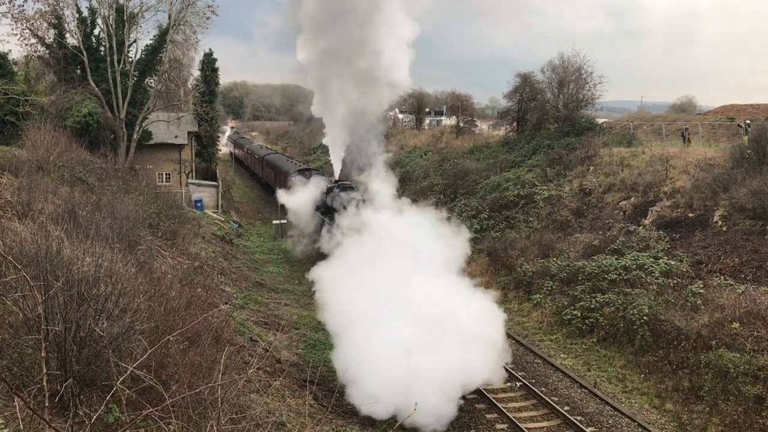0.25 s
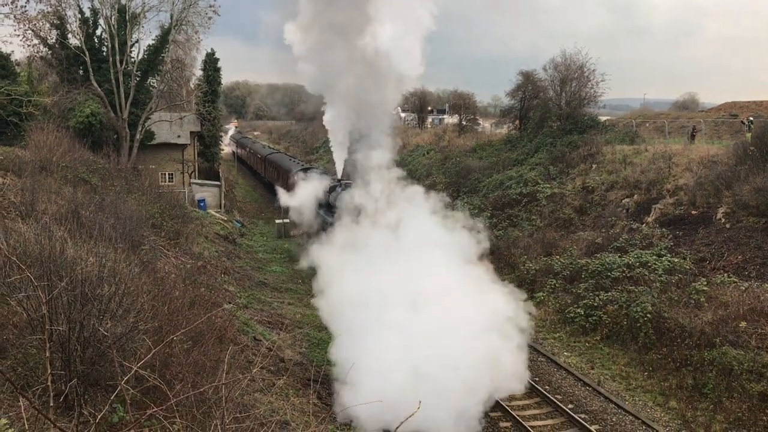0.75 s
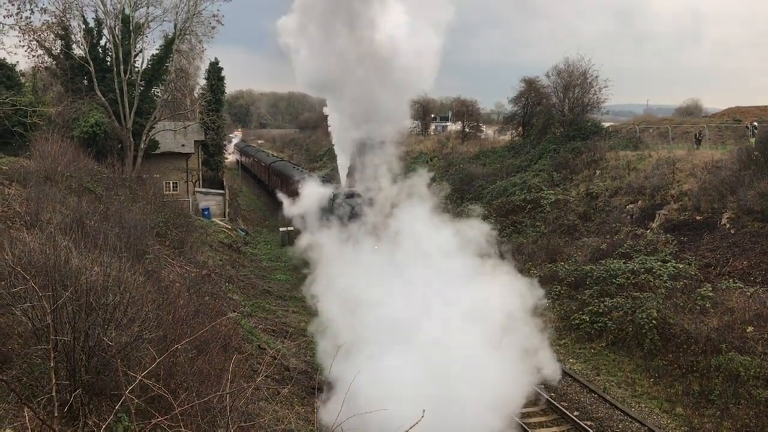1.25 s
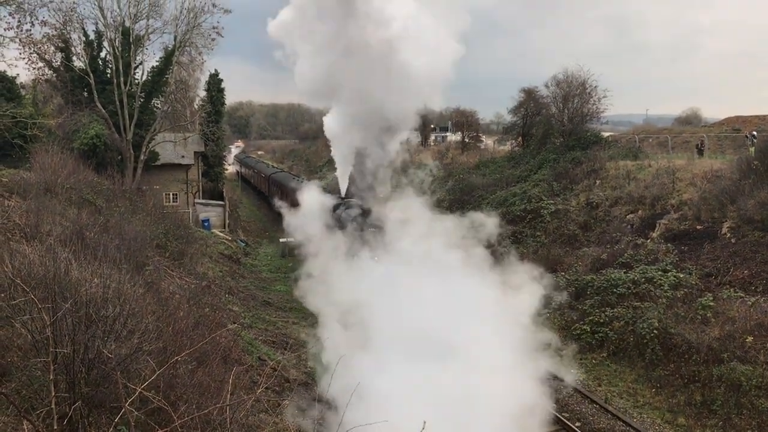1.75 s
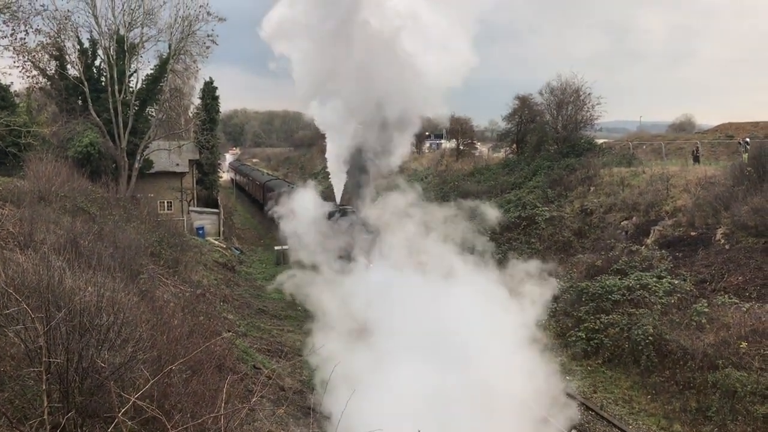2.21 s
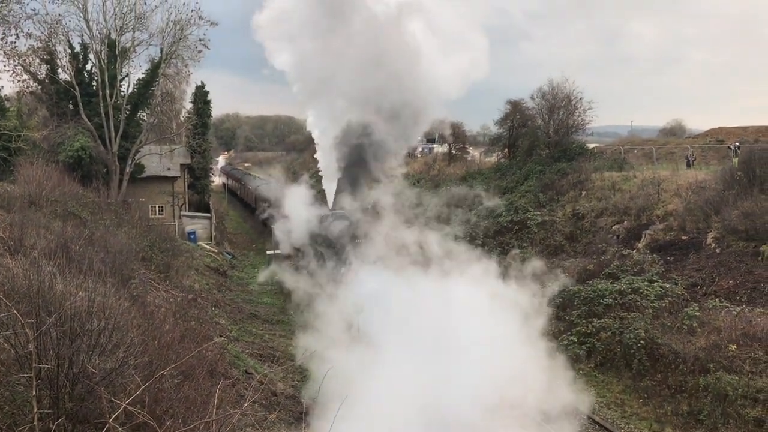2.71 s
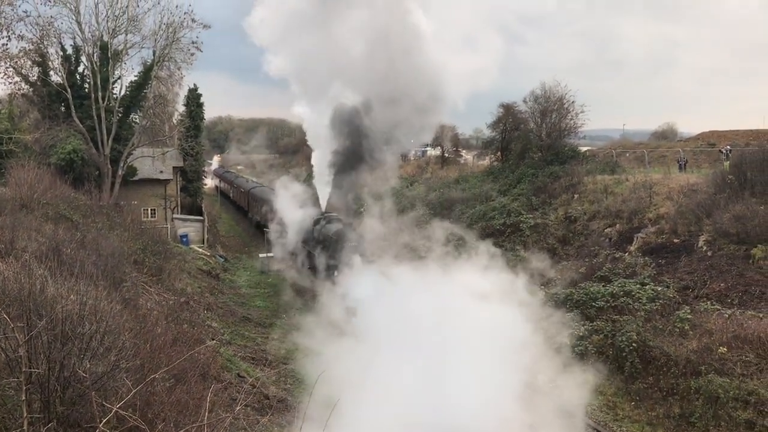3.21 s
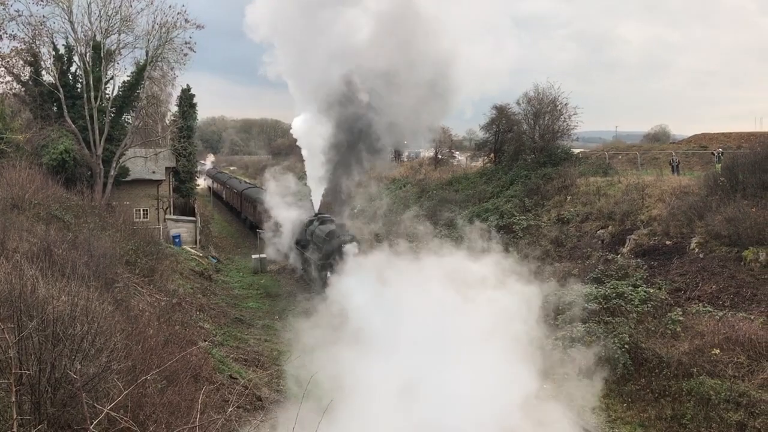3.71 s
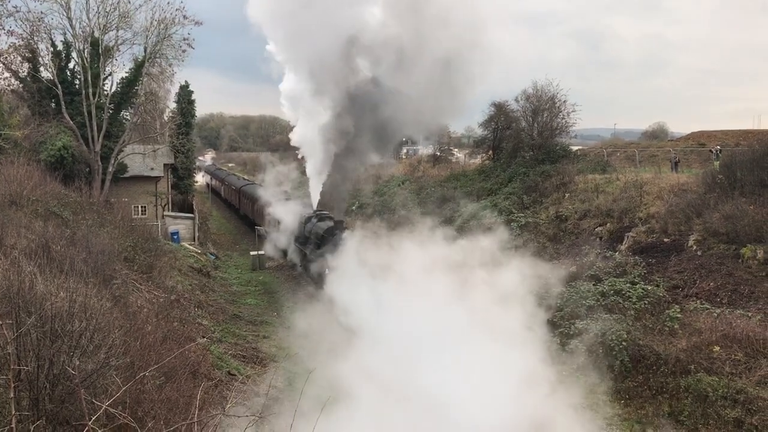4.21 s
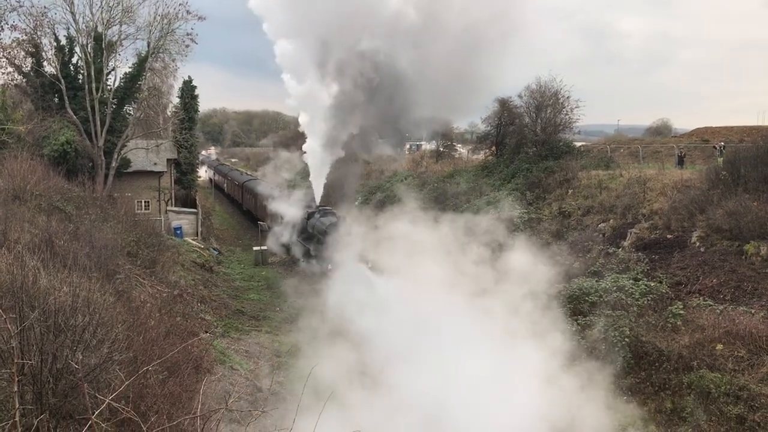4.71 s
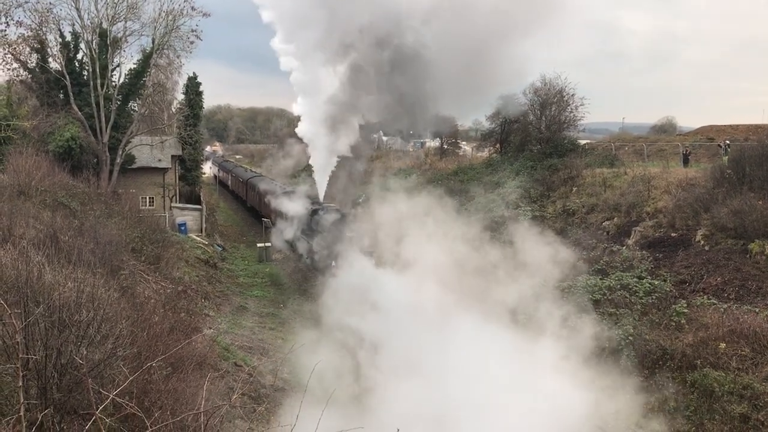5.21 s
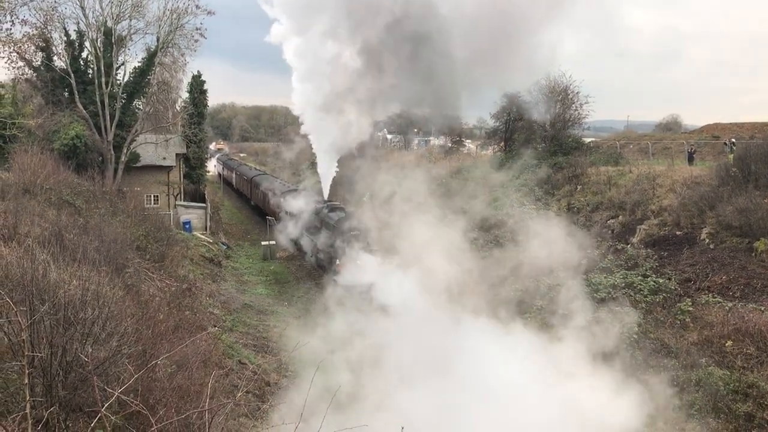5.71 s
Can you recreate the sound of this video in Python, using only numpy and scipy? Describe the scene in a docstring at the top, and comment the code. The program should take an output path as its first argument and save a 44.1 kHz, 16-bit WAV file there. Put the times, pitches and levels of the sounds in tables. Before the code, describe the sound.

Loud steam hiss from a rumbling locomotive drops suddenly to a thinner jet, with a wavering high whistle and a few low wind thuds.

```python
"""A steam locomotive rumbles through a cutting, blowing steam from its cylinder drain cocks and its
safety valve; a narrow leak keeps up a very high, unsteady whistle throughout.
At 2.2 s the cocks shut and the hiss abruptly thins, leaving the valve blowing.
From 2.7 s a breeze gets up; between 3.8 and 5.1 s its eddies bump the microphone with low thuds."""
import sys
import numpy as np
from scipy import signal
from scipy.fft import rfft, irfft, next_fast_len
from scipy.io import wavfile

SR = 44100
rng = np.random.default_rng(int(sys.argv[2]) if len(sys.argv) > 2 else 0)


def waveform_to_disk(signal):
    """Save audio, clipped to [-1, 1], as 16-bit WAV at the path in sys.argv[1]."""
    frames = np.transpose(np.atleast_2d(signal))
    scaled = np.clip(frames, -1, 1) * 32767
    samples = np.round(scaled).astype(np.int16)
    wavfile.write(sys.argv[1], SR, samples)


N = 262395
TIME_S = np.arange(N) / SR
FREQ_HZ = np.maximum(np.fft.rfftfreq(N, 1 / SR), 1)


def from_db(db):
    """Decibels to gain."""
    return 10 ** (np.asarray(db) / 20)


def unit_rms(x):
    """Scale to rms 1."""
    return x / np.sqrt(np.mean(x ** 2) + 1e-20)


def curve(rows):
    """Interpolate (seconds, value) rows at every sample."""
    return np.interp(TIME_S, *np.transpose(rows))


def spectrum_db(rows):
    """Interpolate (Hz, dB) rows on a log-frequency axis."""
    hz, db = np.transpose(rows)
    return np.interp(np.log(FREQ_HZ), np.log(hz), db)


def ramp(start_s, length_s):
    """Linear rise from 0 to 1."""
    return np.clip((TIME_S - start_s) / length_s, 0, 1)


def swell(peak_s, peak_db, sigma_s):
    """Gain of one Gaussian rise and fall."""
    return from_db(peak_db) * np.exp(-((TIME_S - peak_s) / sigma_s) ** 2 / 2)


def filtered(x, gain):
    """Apply a gain per frequency."""
    size = next_fast_len(N, real=True)
    bin_gain = np.interp(np.fft.rfftfreq(size, 1 / SR), FREQ_HZ, gain)
    return irfft(rfft(x, size) * bin_gain, size)[:N]


def noise(gain):
    """Coloured noise, rms 1."""
    return unit_rms(filtered(rng.standard_normal(N), gain))


def drift(corner_hz):
    """Slow random wander, rms 1."""
    hop, settle = 40, 2000
    pole = np.exp(-2 * np.pi * corner_hz * hop / SR)
    white = rng.standard_normal(N // hop + settle + 2)
    slow = signal.lfilter([1], [1, -2 * pole, pole * pole], white)[settle:]
    return np.interp(np.arange(N) / hop, np.arange(len(slow)), unit_rms(slow))


def rumble(lumpy_db):
    """Low, lumpy noise of the rolling train, the breeze and its gusts; their powers add."""
    # Rumble spectrum. Each row: frequency in Hz, relative level in dB.
    colour = [(20, -42), (30, -10), (42, 1.5), (78, 3), (115, -1.5), (170, -11.5), (300, -26), (800, -58)]
    # Each row: peak time in seconds, peak level in dB, sigma in seconds.
    gusts = [(3.02, -38.5, 0.099), (4.12, -37.5, 0.24), (4.674, -33.5, 0.093), (5.046, -36, 0.061)]
    train_db, breeze_db = -47.8, -43.5
    power = from_db(train_db) ** 2 + from_db(breeze_db) ** 2 * ramp(start_s=2.7, length_s=0.12)
    power += sum(swell(*gust) ** 2 for gust in gusts)
    return np.sqrt(power) * from_db(lumpy_db * drift(7.2)) * noise(from_db(spectrum_db(colour)))


def buffets():
    """Each eddy briefly pushes and pulls the microphone diaphragm."""
    # Each row: time in seconds, peak level in dB, pitch in Hz, half length in seconds.
    eddies = [(3.798, -23, 70, 0.0057), (4.185, -31, 72, 0.023), (4.423, -18, 125, 0.0022),
              (4.432, -15.5, 85, 0.0066), (4.644, -21, 66, 0.0087), (4.679, -16, 109, 0.0047),
              (4.701, -27, 70, 0.014), (4.765, -26, 75, 0.0067), (5.014, -32, 80, .016),
              (5.071, -27, 87.4, 0.011)]
    out = np.zeros(N)
    for peak_s, peak_db, hz, half_s in eddies:
        offset_s = TIME_S - peak_s
        envelope = from_db(peak_db) * np.exp(-(offset_s / half_s) ** 2)
        out += envelope * np.cos(2 * np.pi * (hz * offset_s + rng.random()))
    return out


def flares():
    """The jet sings up breathily for a moment as turbulence rings in one resonance."""
    # Each row: peak time in seconds, peak level in dB, sigma in seconds, centre in Hz, width in Hz.
    resonances = [(.3, -30, .15, 2050, 120), (1.48, -28.5, 0.12, 2046, 120),
                  (2.85, -26.5, 0.047, 3440, 800), (3.663, -32.5, .06, 5170, 900),
                  (4.8, -30.5, 0.041, 5000, 900)]
    out = np.zeros(N)
    for peak_s, peak_db, sigma_s, centre_hz, width_hz in resonances:
        resonance = 1 / (1 + (2 * (FREQ_HZ - centre_hz) / width_hz) ** 2)
        out += swell(peak_s, peak_db, sigma_s) * noise(resonance)
    return out


def whistle(flutter_db, wobble_hz, skirt_db, skirt_hz):
    """Edge tone from a narrow leak, with a noisy skirt scattered by the turbulent plume."""
    # Each row: time in seconds, tone level in dB.
    levels = [(0.0, -29.5), (0.25, -35), (0.36, -22.5), (0.77, -34), (0.93, -27.0), (1.0, -39),
              (1.2, -28.6), (1.35, -34), (1.53, -26.5), (2.09, -29), (2.17, -25.3), (2.3, -34),
              (2.42, -27.5), (2.61, -25), (2.92, -35), (3.47, -23.7), (3.56, -33), (4.08, -24.2),
              (4.16, -35), (4.29, -24), (4.86, -37), (5.0, -25.5), (5.13, -40), (5.2, -29.0), (5.7, -32),
              (5.94, -23.5)]
    # Each row: time in seconds, pitch in Hz.
    pitches = [(0, 10700), (.7, 10702), (1.4, 10692), (4.7, 10686), (5.95, 10691)]
    phase = 2 * np.pi * np.cumsum(curve(pitches) + wobble_hz * drift(23)) / SR
    tone = np.sqrt(2) * np.sin(phase) * from_db(curve(levels) + flutter_db * drift(22))
    skirt = drift(skirt_hz) * np.sin(phase) + drift(skirt_hz) * np.cos(phase)
    return tone + from_db(skirt_db) * skirt


def bank_comb(echo_db):
    """Gain per frequency: echoes off the cutting's banks ripple the hiss; grass absorbs their top."""
    # Echo delays in seconds.
    delays_s = [.0071, 0.014, .0197]
    grass_cut_hz = 10000
    echoes = sum(np.exp(-2j * np.pi * FREQ_HZ * delay_s) for delay_s in delays_s)
    return abs(1 + from_db(echo_db) * echoes / np.hypot(1, FREQ_HZ / grass_cut_hz))


def jet_spectrum(colour, humps, low_cut_hz, echo_db):
    """Gain per frequency: broad jet colour, humps from pipe resonances and ground reflections, echoes."""
    humps_db = sum(db / (1 + (2 * (FREQ_HZ - hz) / width_hz) ** 4) for hz, width_hz, db in humps)
    low_cut = 1 / np.sqrt(1 + (low_cut_hz / FREQ_HZ) ** 6)
    return from_db(spectrum_db(colour) + humps_db) * low_cut * bank_comb(echo_db)


def jet(flow_db, spectrum, shimmer_db, surge_db, bands=16):
    """Turbulent steam noise; moving air on the way makes each band swell and fade a little."""
    # Roar, rush, hiss, sizzle. Each row: low edge in Hz, high edge in Hz.
    registers = [(300, 1300), (1450, 4200), (4500, 10000), (11200, 15500)]
    # Lean of the rush. Each row: time in seconds, tilt in dB (+ throaty, - harsh).
    throatiness = [(0, 0), (.4, 0.9), (1.0, -0.55), (2.7, -1.2), (3.05, 0.7), (4.0, -0.5), (5.25, 1.1),
                   (5.65, -2.5)]
    steam = noise(spectrum)
    power = spectrum ** 2 / np.sum(spectrum ** 2)
    shares = np.array([power[(FREQ_HZ > low) & (FREQ_HZ < high)].sum() for low, high in registers])
    lift_db = np.array(flow_db) - 10 * np.log10(shares)[:, None]  # brings each register to flow_db
    common_db, throat_db = surge_db * drift(14), curve(throatiness)
    centres_hz = np.geomspace(250, 14000, bands)
    out = np.zeros(N)
    for hz, selector in zip(centres_hz, np.eye(bands)):
        register = np.interp(hz, [1150, 1550, 3700, 4800, 7000, 12000], [0, 1, 1, 2, 2, 3])
        weights = np.maximum(1 - abs(np.arange(len(registers)) - register), 0)
        tilt = np.interp(hz, [1200, 1600, 2150, 2800, 3700, 4800], [0, 1, 1, -1, -1, 0])
        gain_db = weights @ lift_db + tilt * throat_db + common_db + shimmer_db * drift(4)
        band = filtered(steam, np.interp(FREQ_HZ, centres_hz, selector))
        out += band * from_db(gain_db)
    return out


def cocks_and_valve():
    """Drain cocks and safety valve blow together: full hiss over a steady low roar."""
    # Jet spectrum. Each row: frequency in Hz, relative level in dB.
    colour = [(100.0, -19), (300.0, -13), (800.0, -20), (1500.0, -4), (3200.0, -1.5), (4600.0, -1),
              (6000.0, -0.5), (7700.0, -3), (9300.0, -4), (10400.0, -9.5), (12600.0, -10.5), (15700.0, -19)]
    # Pipe and ground humps. Each row: centre in Hz, width in Hz, gain in dB.
    humps = [(223, 70, 8), (307, 50, 2), (456, 144, 7), (707, 247, 13.5), (1055, 310, 10.5), (1425, 80, -5),
             (1583, 210, 4.5), (2000, 200, 8), (2125, 72, 5.5), (2267, 23, 8.5), (2450, 51, 5),
             (2790, 220, 2.5), (3196, 89, 6.5), (3480, 160, 4.5), (3820, 130, 3.5), (4190, 190, 2),
             (4880, 200, -3), (5300, 120, 4.5), (5750, 140, 3)]
    # Jet body, hiss above it, wind-borne sizzle on top. Each row: time in seconds, level in dB.
    rush = [(0.0, -20.5), (0.38, -21), (0.45, -22), (1.33, -22.5), (1.5, -22), (1.92, -23), (2.19, -21.5)]
    hiss = [(0.0, -21.5), (0.53, -25.0), (0.85, -21.5), (1.52, -21), (1.9, -25), (2.19, -25)]
    sizzle = [(0.0, -32), (0.13, -36), (0.4, -34), (0.62, -34), (1.48, -28.2), (2.03, -36), (2.19, -33)]
    roar_db = np.full(N, -30.5)
    flow_db = [roar_db, curve(rush), curve(hiss), curve(sizzle)]
    spectrum = jet_spectrum(colour, humps, low_cut_hz=113, echo_db=-21.5)
    return jet(flow_db, spectrum, shimmer_db=0.7, surge_db=0.34)


def valve_alone():
    """The safety valve's thinner jet; the low roar lulls, partly returns and slowly fades."""
    # Jet spectrum. Each row: frequency in Hz, relative level in dB.
    colour = [(100.0, -4.5), (300.0, -10.5), (800.0, -13), (1500.0, -1), (3200.0, 0.5), (4600.0, 1.3),
              (6000.0, 1.5), (7700.0, -2.5), (9300.0, -2.1), (10400.0, -8), (12600.0, -10.5),
              (15700.0, -16.5)]
    # Pipe and ground humps. Each row: centre in Hz, width in Hz, gain in dB.
    humps = [(222, 82, 5), (639, 272, 8), (756, 58, -4.5), (907, 114, 7), (1138, 140, 6.5), (1323, 46, 2),
             (1590, 190, 4.5), (1990, 520, 5.5), (2350, 220, -2.5), (2845, 300, 3), (3293, 380, 4.5),
             (3700, 450, 0.7), (4530, 220, -5), (5400, 130, 1)]
    # Jet body, hiss above it, wind-borne sizzle on top. Each row: time in seconds, level in dB.
    rush = [(2.23, -26), (2.85, -23.5), (3.64, -27.5), (4.25, -25.5), (5.03, -26.2), (5.25, -25),
            (5.42, -26.5), (5.54, -22.5), (5.64, -25.5), (5.94, -23)]
    hiss = [(2.23, -28.7), (2.58, -27.5), (2.71, -28), (3.43, -26.5), (4.17, -29.5), (4.29, -28),
            (4.62, -28), (4.71, -27), (5.94, -24.3)]
    sizzle = [(2.23, -37), (2.6, -32), (2.71, -39), (3.21, -31.5), (3.45, -32), (3.54, -39), (3.8, -32.5),
              (4.08, -36.5), (4.36, -33.5), (5.38, -36.5), (5.94, -35)]
    lull_db, return_db, fade_db_per_s = -36.5, -32.5, 0.69
    return_s, rise_s = 2.75, 0.09
    fading_db = return_db - fade_db_per_s * (TIME_S - return_s)
    roar_db = lull_db + (fading_db - lull_db) * ramp(return_s - rise_s / 2, rise_s)
    flow_db = [roar_db, curve(rush), curve(hiss), curve(sizzle)]
    spectrum = jet_spectrum(colour, humps, low_cut_hz=153, echo_db=-22)
    return jet(flow_db, spectrum, shimmer_db=1.2, surge_db=0.4)


def venting(shut_s, closing_s):
    """The drain cocks close and leave the safety valve blowing; equal-power crossfade."""
    shut = ramp(shut_s - closing_s / 2, closing_s)
    return np.sqrt(1 - shut) * cocks_and_valve() + np.sqrt(shut) * valve_alone()


def scene():
    """Train straight ahead, both channels alike."""
    leak = whistle(flutter_db=1.3, wobble_hz=3.06, skirt_db=-37.5, skirt_hz=38)
    steam = venting(shut_s=2.208, closing_s=0.016)
    mix = rumble(lumpy_db=0.9) + buffets() + flares() + leak + steam
    return np.array([mix, mix])


def record(dry):
    """Drop the deepest bass and cut the top steeply."""
    low_cut_hz, high_cut_hz, edge_hz = 28, 15750, 150
    thinned = signal.sosfilt(signal.butter(2, low_cut_hz, "high", fs=SR, output="sos"), dry)
    high_cut = np.clip((high_cut_hz - FREQ_HZ) / edge_hz + 0.5, 0, 1)
    return np.array([filtered(channel, high_cut) for channel in thinned])


dry = scene()
out = record(dry)
waveform_to_disk(out)
```